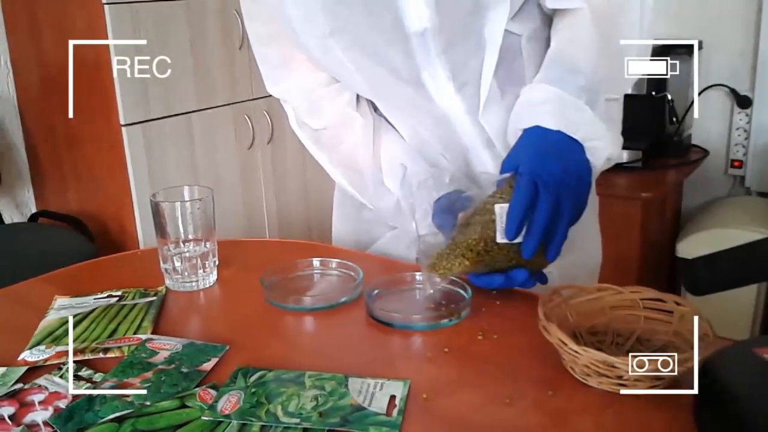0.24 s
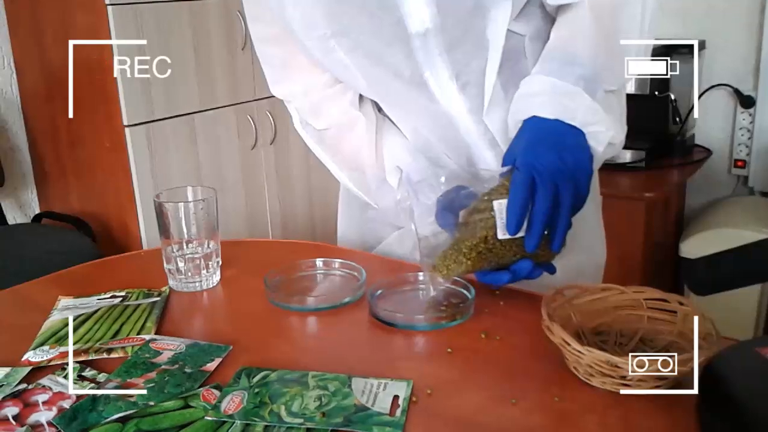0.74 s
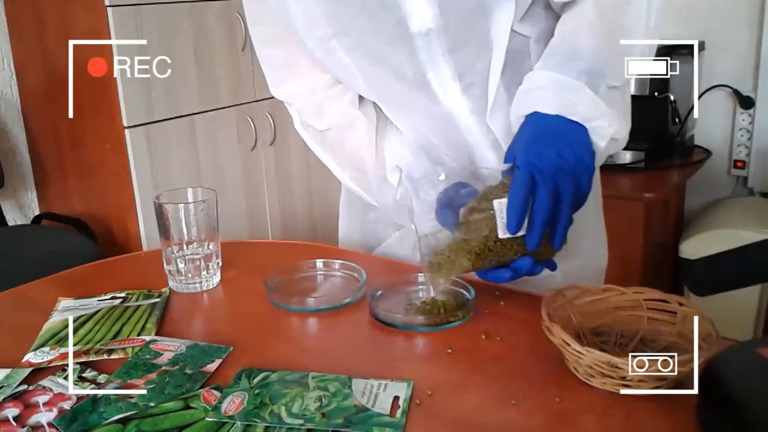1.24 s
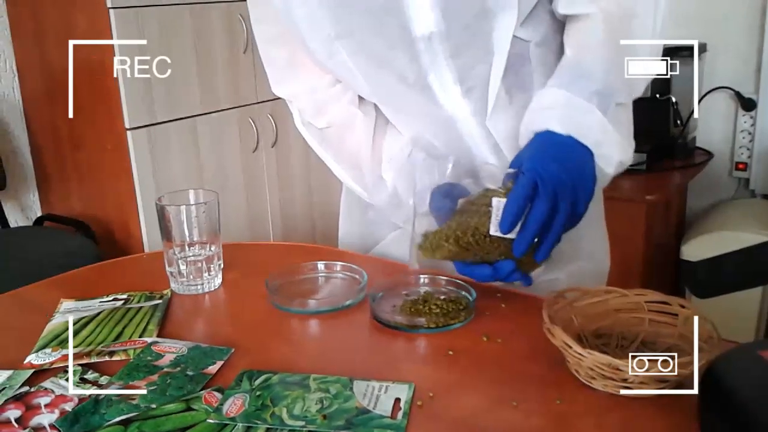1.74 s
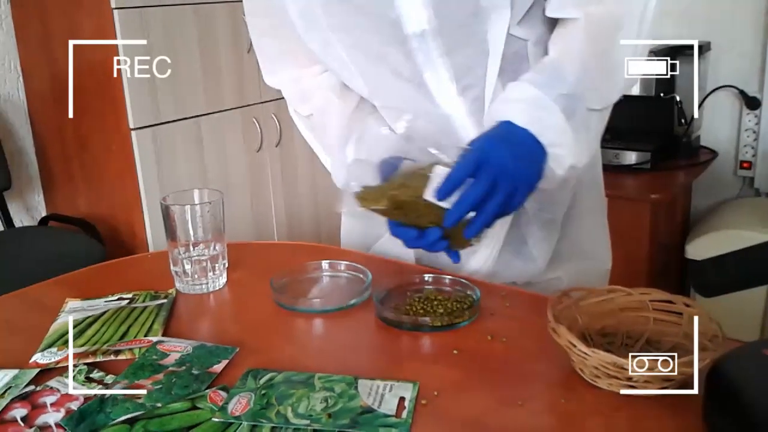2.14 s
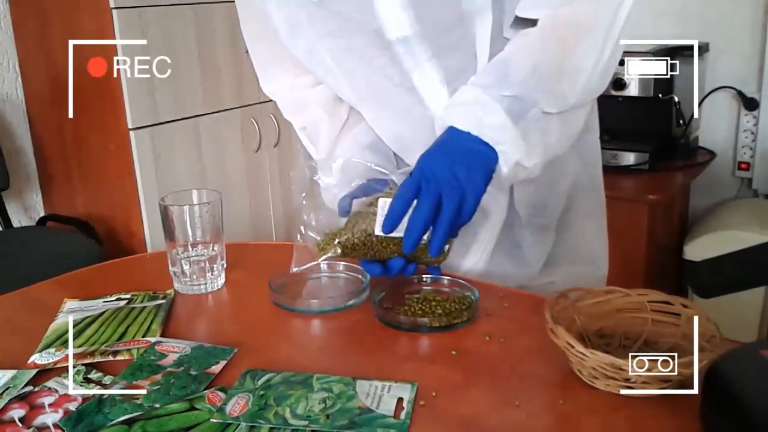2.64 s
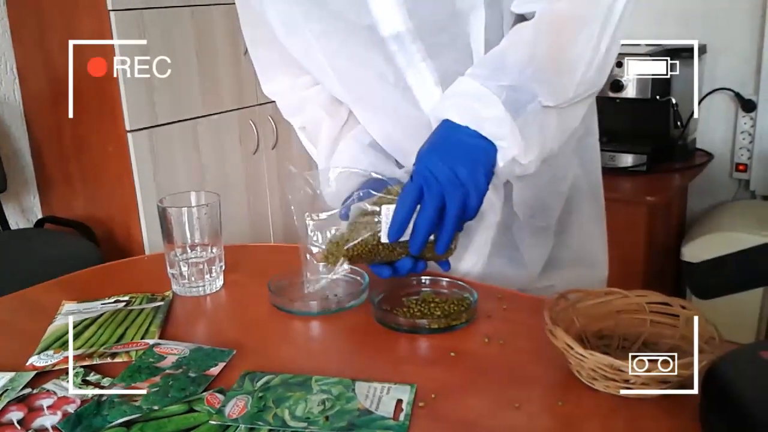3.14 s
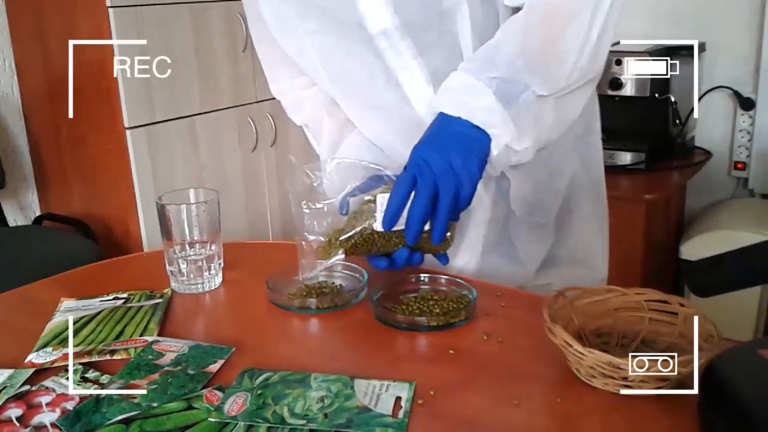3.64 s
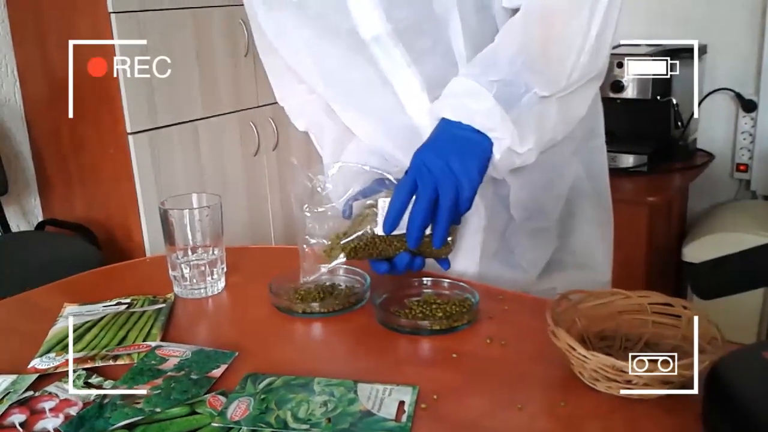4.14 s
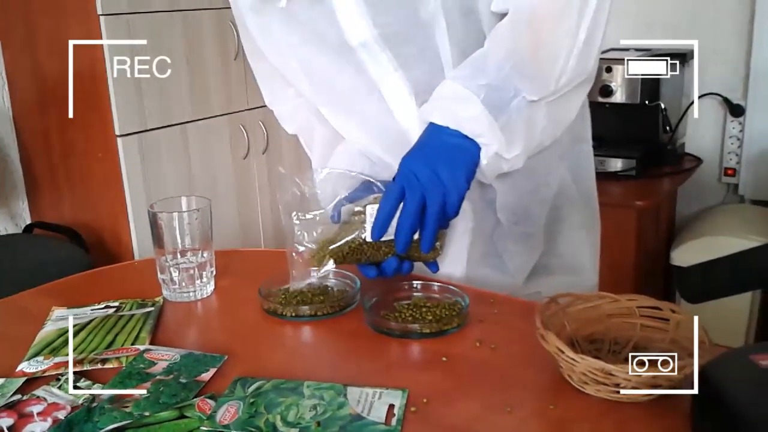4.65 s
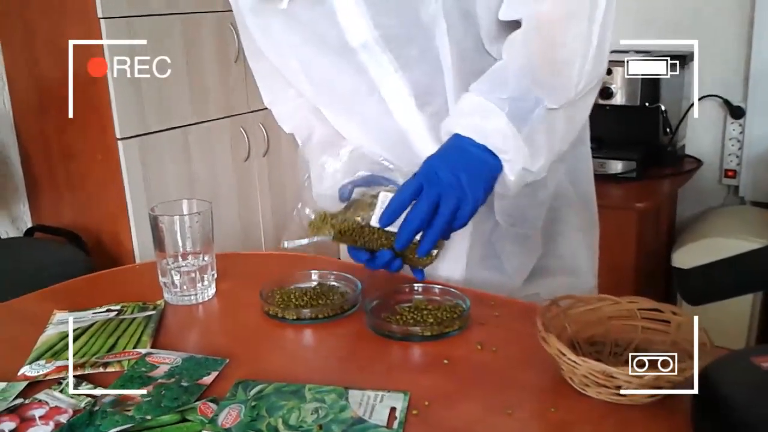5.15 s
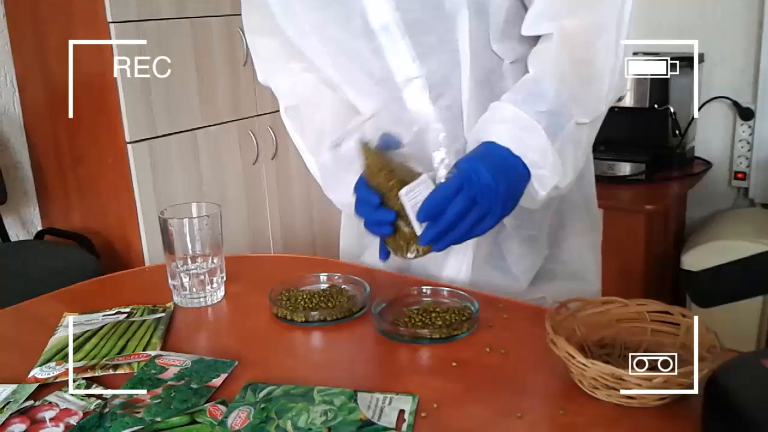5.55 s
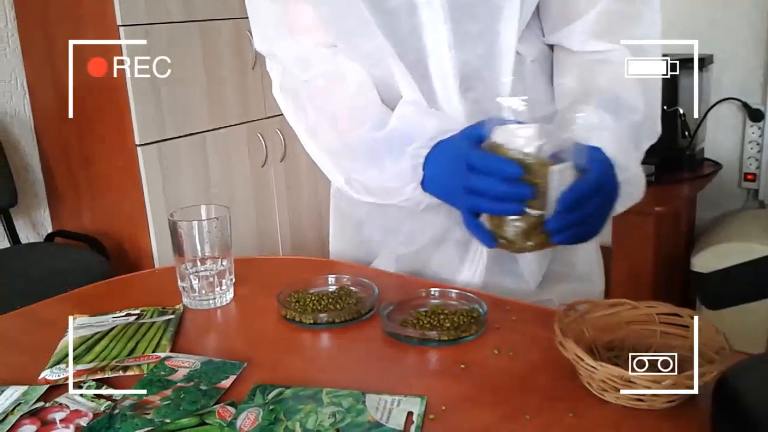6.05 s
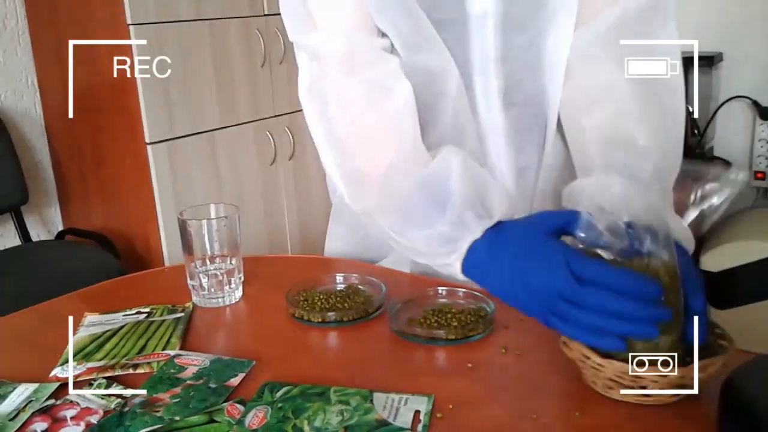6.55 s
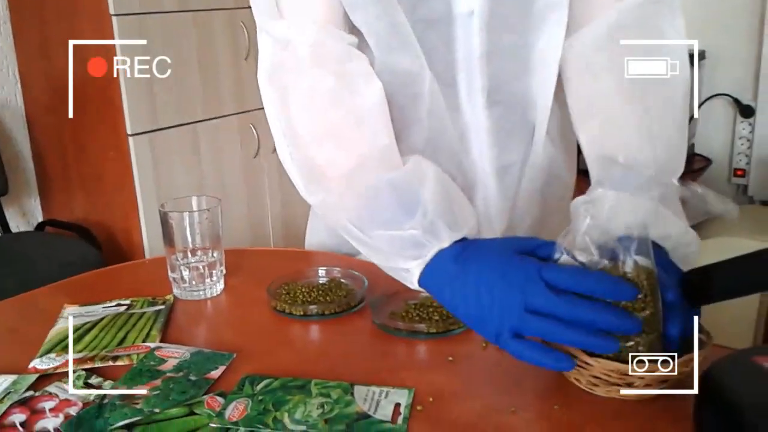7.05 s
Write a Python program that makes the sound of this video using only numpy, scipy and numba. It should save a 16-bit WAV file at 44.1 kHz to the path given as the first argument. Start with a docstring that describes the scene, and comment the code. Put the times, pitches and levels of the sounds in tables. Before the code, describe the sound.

Close in a small room, a plastic bag of dry beans crackles and its load slides with a swish. Beans rush into a thin glass dish with a bright, dense, glassy rattle that dulls as the heap grows. After a near-quiet gap, a lighter patter fills a second dish. Then the bag crunches loudly, beans tumbling inside, and is set down. The microphone sounds sharp and thin, with a piercing treble peak.

```python
"""Dry beans into two glass dishes

Small dry beans are poured from a crinkly plastic bag into two shallow glass dishes on a table, one by one.
Random impacts drive the gliding modes of the glass; as each heap grows, its weight lowers and damps them.
Bean clicks and bag rustle are coloured contact noise; creases snap as short bursts in four bands.
The bag is then turned upright and set down in a wicker basket.
A small room answers the sounds, and a microphone with a sharp treble peak colours it all."""
import sys
import numpy as np
from scipy import signal
from scipy.fft import rfft, irfft, next_fast_len
from scipy.io import wavfile
from scipy.ndimage import uniform_filter1d
from numba import njit

SR = 44100
rng = np.random.default_rng(int(sys.argv[2]) if len(sys.argv) > 2 else 0)


def digitize_waveform(pressure):
    """Quantize a signal to 16-bit integers and store it at the path in sys.argv[1].

    Rows of a 2-D input are taken as channels; values are limited to [-1, 1].
    """
    field = np.atleast_2d(pressure).T
    bounded = np.clip(field, -1, 1)
    quanta = np.round(bounded * 32767).astype(np.int16)
    wavfile.write(sys.argv[1], SR, quanta)


N = 322371


def amp(db):
    """Decibels to gain."""
    return 10 ** (np.asarray(db) / 20)


def unit(x):
    """Scaled to rms 1."""
    return x / np.sqrt(np.mean(x ** 2) + 1e-20)


def along(points, hz):
    """(f/Hz, value) points read on a log frequency axis."""
    f, v = np.transpose(points)
    return np.interp(np.log(hz + 1), np.log(f + 1), v)


def curves(rows, outside=None):
    """One value per sample for each column after the time."""
    s, *cols = np.transpose(rows)
    t = np.arange(N) / SR
    return [np.interp(t, s, c, outside, outside) for c in cols]


def swells(rows):
    """Gain over time from bell-shaped swells (t/s, half length/s, level/dB)."""
    t = np.arange(N) / SR
    return sum(amp(db) * np.exp(-np.minimum(((t - s) / length) ** 2, 50)) for s, length, db in rows)


def coloured(x, points):
    """x through the causal minimum-phase filter with these (f/Hz, level/dB) points."""
    size = 2 * next_fast_len(N // 2 + 8192)
    gain = amp(along(points, np.fft.rfftfreq(size, 1 / SR)))
    cepstrum = irfft(np.log(gain))
    # folding the cepstrum forward in time makes the filter causal
    cepstrum[1:size // 2] *= 2
    cepstrum[size // 2 + 1:] = 0
    return irfft(rfft(x, size) * np.exp(rfft(cepstrum)))[:N]


def shaped(x, points):
    """x in the colour of a body, with the filter's mean power gain set to 1."""
    power = np.mean(amp(along(points, np.linspace(0, SR / 2, num=4096))) ** 2)
    return coloured(x, points) / np.sqrt(power)


def patter(rate, spread_db):
    """Random contacts of uneven size, rate a second, levelled to a local mean power near 1."""
    sizes = amp(spread_db * rng.standard_normal(N))
    hits = (rng.random(N) < rate / SR) * sizes * rng.choice([-1, 1], N)
    power = uniform_filter1d(uniform_filter1d(hits ** 2, size=2600), size=2600)
    return hits / np.sqrt(np.abs(power) + 1e-9)


def rustle(colour, rate, spread_db, rub):
    """Tiny contacts, each ringing briefly at one of many pitches, on a bed of smooth rubbing noise; rms 1."""
    grains = np.zeros(N)
    for hz in np.geomspace(300, 14000, num=14):
        grains += signal.lfilter(*signal.iirpeak(hz, 3, fs=SR), patter(rate, spread_db))
    return unit(coloured(unit(grains) + rub * rng.standard_normal(N), colour))


USUAL_DB = -50  # usual handling level


def following(level_db, law):
    """Gain of a layer that rises and falls with a handling level."""
    layer_db, slope = law
    return amp(layer_db + slope * (level_db - USUAL_DB))


# the five moves of the bag: (t/s, beans sliding level/dB, film crinkling level/dB before its lift)
TIPPING = [(0.0, -46.5, -41.5), (0.3, -32.5, -53), (0.41, -41.5, -49), (0.54, -56, -70.5),
           (0.95, -61.5, -93)]
OVER_FIRST_DISH = [(1.099, -50, -71), (1.24, -38.5, -65), (1.33, -39.5, -53.5), (1.65, -42, -51),
                   (1.83, -48.5, -64.5), (2.16, -48.5, -61.5), (2.32, -57, -70), (2.48, -67, -74),
                   (2.6, -92, -121)]
OVER_SECOND_DISH = [(3.05, -89.5, -100), (3.48, -56.5, -79), (3.7, -52, -60), (3.95, -50.5, -55),
                    (4.55, -60, -67.5), (5.2, -50, -57), (5.56, -50, -67.5)]
TURNING_UPRIGHT = [(5.63, -49.5, -63.5), (5.71, -33.5, -43), (5.88, -41, -53.5), (6.0, -31, -51),
                   (6.13, -34, -47.5), (6.27, -54.5, -62)]
SETTING_DOWN = [(6.3, -54, -63), (6.42, -44.5, -62.5), (6.5, -52.5, -57), (6.64, -43, -49.5),
                (6.77, -32.5, -46), (6.83, -45, -55), (6.94, -35.5, -45.5), (7.06, -45, -49),
                (7.19, -43, -49.5), (7.31, -44, -52.5)]
HANDLING = TIPPING + OVER_FIRST_DISH + OVER_SECOND_DISH + TURNING_UPRIGHT + SETTING_DOWN
# layers that go along with it: (level/dB at the usual handling level, gain/dB per dB of handling)
SHIFT_LAW = (-58, 0.59)
GLIDE_LAW = (-56, 0.55)
# the whole load tumbles over in the bag: (t/s, half length/s, level/dB)
TUMBLES = [(5.71, 0.038, -35), (6.04, 0.14, -41), (6.77, 0.023, -46), (6.94, 0.046, -49)]
# runs of beans skidding down the film: (t/s, half length/s, level/dB)
SKIDS = [(0.48, 0.14, -59.5), (1.36, 0.028, -54), (2.39, 0.056, -56), (3.65, 0.28, -59), (5.46, 0.065, -58),
         (5.71, 0.04, -55), (6.5, 0.044, -52.5), (7.18, 0.06, -74)]
# colours of load shifting, beans sliding, film crinkling, beans hissing over film: (f/Hz, relative level/dB)
SHIFT_COLOUR = [(120, -32), (280, 2), (480, 3), (750, 2), (1200, -16.5), (2500, -29)]
SLIDE_COLOUR = [(400, -37), (900, -1), (1600, 2), (2400, -0.5), (3400, -6.5), (4300, -18), (6000, -39.5),
                (15000, -59)]
FILM_COLOUR = [(1500, -23), (2800, 2.5), (3800, 4), (5000, 2), (6700, -13.5), (8000, -8.5), (11000, -11.5),
               (15500, -14.5)]
GLIDE_COLOUR = [(3500, -53.5), (5800, -16), (6500, -1.5), (6950, -2.5), (7400, -11), (8200, -11.5),
                (9500, -21), (15000, -20.5)]


def bag():
    """The beans slide and shift inside the bag, and hiss over its film as that crinkles."""
    slide_db, film_db = curves(HANDLING)
    shift_gain = following(slide_db, SHIFT_LAW) + swells(TUMBLES)
    glide_gain = np.hypot(following(film_db, GLIDE_LAW), swells(SKIDS))
    film_gain = amp(film_db + 9.5)  # the film's lift
    shift = shift_gain * rustle(SHIFT_COLOUR, rate=150, spread_db=5.5, rub=0.33)
    slide = amp(slide_db) * rustle(SLIDE_COLOUR, rate=300, spread_db=5.5, rub=0.15)
    film = film_gain * rustle(FILM_COLOUR, rate=220, spread_db=1.5, rub=0.86)
    glide = glide_gain * rustle(GLIDE_COLOUR, rate=600, spread_db=8.5, rub=0.44)
    return shift + slide + film + glide


# low background rumble that rises and falls over time: (t/s, deep level/dB, upper bass level/dB)
RUMBLE = [(0.0, -46, -44.5), (0.5, -57, -48.5), (1.0, -52.5, -54.5), (1.3, -57, -51.5), (2.25, -59, -52.5),
          (2.6, -68.5, -65), (2.95, -69.5, -72.5), (3.5, -64.5, -63.5), (3.8, -60, -61), (4.25, -64, -53),
          (4.6, -61, -58), (5.55, -63, -55.5), (5.7, -62, -50.5), (5.85, -61, -56), (6.0, -63, -54),
          (6.55, -62, -57.5), (6.75, -49, -47), (7.0, -56, -52), (7.31, -57, -51)]
# dull bumps of the hands and bag: (t/s, half length/s, deep level/dB)
BUMPS = [(0.04, 0.1, -38), (0.29, 0.091, -35.5), (0.45, 0.082, -45.5), (0.61, 0.02, -43.5),
         (0.81, 0.1, -39.5), (4.57, 0.057, -52), (6.72, 0.065, -40.5), (6.86, 0.03, -46),
         (7.09, 0.038, -55)]
BUMP_BASS_DB = -9.5  # upper bass of a bump, against its deep part
# colours of the deep part, the upper bass and the steady hiss: (f/Hz, relative level/dB)
DEEP_COLOUR = [(20, -32), (40, -10), (62, -4), (105, -1), (150, -12), (300, -57)]
BASS_COLOUR = [(80, -33.5), (135, 5.5), (175, 4), (260, -3.5), (400, -19.5), (900, -43.5)]
HISS_COLOUR = [(30, 18), (150, 17), (400, 13.5), (900, -5.5), (2000, -6), (6000, -7.5), (12000, 1.5),
               (16000, -3)]


def background():
    """Low rumble of varying level, a few bumps and a faint steady hiss, all from filtered noise."""
    def noise(colour):
        return unit(coloured(rng.standard_normal(N), colour))

    deep_db, bass_db = curves(RUMBLE)
    bumps = swells(BUMPS)
    deep = np.hypot(amp(deep_db), bumps)
    bass = np.hypot(amp(bass_db), amp(BUMP_BASS_DB) * bumps)
    return deep * noise(DEEP_COLOUR) + bass * noise(BASS_COLOUR) + amp(-73.5) * noise(HISS_COLOUR)


THUD_HZ, BODY_HZ = 713, 1900  # usual pitches of a snap's thud and of a small crease
PITCH_SCATTER = 0.16  # spread of both, in natural-log units
CRACKLE_DB, CRACKLE_SPREAD_DB = 22.5, 3.5  # small creases against the handling level, and their spread


def crackles(count):
    """Small creases at random moments, as strong as the bag is being worked; rows like those of SNAPS."""
    handling_db = np.mean(curves(HANDLING), axis=0)
    at = rng.integers(N, size=count)
    pitch, size, thud, bright = rng.standard_normal((count, 4)).T
    body_hz = BODY_HZ * np.exp(PITCH_SCATTER * pitch)
    level_db = handling_db[at] + CRACKLE_DB + CRACKLE_SPREAD_DB * size
    return list(zip(at / SR, body_hz, level_db, -11 + 5 * thud, -2 + 6 * bright))


def burst(low_hz, high_hz, t60, after_db, after_t60):
    """A crack in one band, energy 1, and the weaker, longer flutter of the film that goes with it."""
    t = np.arange(SR // 8) / SR
    band = signal.butter(2, [low_hz, min(high_hz, .45 * SR)], "band", fs=SR, output="sos")
    rise = 1 - np.exp(-t / 0.00041)  # the crease takes a moment to give way
    fades = rise * np.array([amp(-60 * t / t60), amp(-60 * t / after_t60)])
    parts = signal.sosfilt(band, fades * rng.standard_normal(fades.shape))
    crack, flutter = parts / np.linalg.norm(parts, axis=1, keepdims=True)
    return crack + amp(after_db) * flutter


# creases of the bag snapping over: (t/s, body f/Hz, level/dB, thud of the beans behind it: relative
# level/dB before its trim, brightness: relative level/dB before the crack's trim)
SNAPS = [(0.0105, 2180, -6, -14, 2), (0.0367, 2220, -6, -28.5, 5.5), (0.109, 2080, -7.5, -22, 11),
         (0.1236, 3000, -23, -16.5, 22), (0.2438, 3230, 0, -26, -0.5), (0.3418, 1910, -0.5, -18, -1),
         (0.37, 1600, -1, -9.5, -0.5), (0.3817, 1700, -4.5, -22, -14), (0.4334, 2560, -3, -24.5, -1.5),
         (0.4965, 2930, -10.5, -30.5, 0.5), (0.53, 3300, -14.5, -30, -11), (0.6099, 1690, -2.5, -17, -32),
         (0.63, 3240, -14, -22, -14), (0.8186, 1200, -18, -5, -12), (1.1638, 1440, -4, -9.5, -7),
         (1.2847, 1600, -1, -5, -8.5), (1.2888, 462, -2.5, -23, -23.5), (1.5329, 1550, -9.5, -5, 2.5),
         (1.9731, 1500, -4.5, -18, -27), (2.0932, 1520, -7, -11, -17), (2.1058, 1600, -0.5, -18.5, -10),
         (2.1791, 1600, -20, 5, -15), (2.2431, 1660, -11, -20, 4), (2.2997, 1760, -14, -22, -21),
         (2.4701, 3080, -19, -34, -2), (2.941, 1460, -45.5, 0.5, -17), (3.5817, 1600, -19.5, -15, -2),
         (3.6637, 1600, -11.5, -16, -15), (3.8323, 1960, -8, -14, -3), (3.9454, 2760, -7.5, -11, -5.5),
         (4.2363, 630, -11.5, -27, 4), (4.2446, 1740, -9.5, -3.5, -3), (5.2383, 1730, -10.5, -30, -1),
         (5.306, 735, 1.5, -20, -9.5), (5.3422, 1400, -13, -8, 8), (5.4295, 3140, -6, -9.5, -15),
         (5.4341, 2470, -18, -13, 12), (5.4902, 870, -8.5, -12, -11), (5.5987, 1630, -16.5, -3, -11),
         (5.6308, 1640, -6.5, -9, -9), (5.6684, 2630, -2, -3.5, -2), (5.6732, 1360, -5, -17.5, -1.5),
         (5.7171, 1550, -3, -22, 2), (5.7427, 1480, -8, 0.5, -12), (5.748, 3300, 0, -18, -0.5),
         (5.7754, 1540, 5, -7.5, -10), (5.831, 1810, -4.5, -12, -5), (5.861, 2020, -9, -3, 2),
         (5.9449, 2170, -4, -6, -24), (5.9945, 1470, -8.5, -14, -22), (6.0197, 3140, -4, -28, 0.5),
         (6.0765, 1870, -2.5, -20, -25), (6.1333, 1630, -5, 0, -11), (6.1755, 1920, -2, -16, -3.5),
         (6.224, 1460, -14, -1, -4), (6.308, 1990, -5, -5, -4), (6.3347, 2250, -11.5, -7, -4.5),
         (6.417, 1560, -1, -7, -29), (6.451, 1900, -3, -11.5, -8), (6.49, 1920, -4, -13, -17.5),
         (6.5258, 1740, -4.5, -11.5, -18), (6.5502, 2050, 2.5, -12.5, -3), (6.5625, 1980, -8, -18, -1.5),
         (6.5937, 1790, -8.5, -28, 0.5), (6.6309, 1700, -1, -10.5, -10), (6.677, 1970, 0, -10, -8.5),
         (6.6846, 2600, -1, -24, -16), (6.6912, 2180, 3, -2.5, -5), (6.7212, 2310, 6.5, -19, -1),
         (6.7462, 2210, 5, -6, -3), (6.7614, 2270, 2.5, -27.5, 1.5), (6.7809, 1780, -8.5, -14, 10),
         (6.799, 1450, 1.5, -5.5, -9.5), (6.8393, 3000, -22, -16, 17.5), (6.8506, 1340, 3.5, -14.5, -3.5),
         (6.86, 1920, 5.5, -14, -1.5), (6.9197, 1990, 2, -37, -15.5), (6.9541, 1590, -4, -5.5, -4),
         (6.9632, 2200, 1, -5, -5.5), (6.98, 2480, -4, -28, -10.5), (7.0029, 2900, 4.5, -32, -4),
         (7.047, 1740, -8, -17, 4), (7.0682, 1580, -5, -2.5, 1), (7.1079, 1800, 1.5, -17, -15),
         (7.1628, 2760, -2.5, -19, -2), (7.2167, 3100, -7, -31, -6), (7.25, 1630, -2.5, -6.5, -14)]
EDGE_DB, EDGE_PER_BRIGHTNESS = -6, 0.41  # the hard edge of a snap grows with its brightness


def snaps():
    """Each crease snaps with a thud, a body, a hard edge and a treble crack, each with its flutter."""
    out = np.zeros(N + SR)
    for s, body_hz, db, weight_db, bright_db in SNAPS + crackles(count=50):
        thud_hz = THUD_HZ * np.exp(PITCH_SCATTER * rng.standard_normal())
        edge_db = EDGE_DB + EDGE_PER_BRIGHTNESS * bright_db
        thud = burst(0.58 * thud_hz, 1.3 * thud_hz, t60=0.0078, after_db=-4.5, after_t60=0.16)
        body = burst(0.73 * body_hz, 1.438 * body_hz, t60=0.0095, after_db=-3.5, after_t60=0.096)
        edge = burst(3000, 4600, t60=0.0083, after_db=-4.0, after_t60=0.13)
        crack = burst(4300, 12050, t60=0.0083, after_db=-3, after_t60=0.19)
        snap = amp(weight_db + 2.0) * thud + amp(-1.0) * body + amp(edge_db) * edge + amp(bright_db - 7) * crack
        out[round(s * SR):][:len(snap)] += amp(db) * snap
    return out[:N]


# colour of a bean's click: (f/Hz, relative level/dB)
BEAN_COLOUR = [(300, -21.5), (1200, -22.5), (1600, -4.5), (2300, -28.5), (2900, -3), (3280, 12),
               (3650, 4.5), (4200, -21.5), (5500, -20), (7000, -19), (9000, -44.5), (15000, -46.5)]
BEAN_SIZE_SPREAD = 0.049  # large beans click lower by this share, small beans higher


def clicking(contacts):
    """Each contact sounds with the click of a large, a usual or a small bean."""
    size = rng.integers(-1, 2, N)
    out = np.zeros(N)
    for k in (-1, 0, 1):
        colour = np.array(BEAN_COLOUR) * [1 - k * BEAN_SIZE_SPREAD, 1]
        out += shaped(contacts * (size == k), colour)
    return out


@njit
def ringing(drive, turn, loss):
    """One mode whose pitch and damping (radians, nepers a sample) change; it keeps its drive's power."""
    out, state = np.zeros(len(drive)), 0j
    for i in range(len(drive)):
        state = state * np.exp(1j * turn[i] - loss[i]) + drive[i] * 2 * np.sqrt(loss[i])
        out[i] = state.imag
    return out


BLOW_SPREAD_DB = 2.5  # uneven strength of the blows on the glass


def pour(stream, filling, modes, taps, damping, glass_rate, click_rate, click_spread_db,
         ring_db, cover_db, click_db, heap_db, tick_db):
    """Beans bounce on glass and heap; the heap's weight lowers the glass modes and shortens their ring."""
    flow = amp(curves(stream, outside=-120)[0])
    fill = np.clip(curves(filling)[0], 0, 1)
    covered = np.sqrt(fill)  # the first beans cover the most glass
    hard = np.zeros(N)
    for s, db in taps:
        hard[round(s * SR)] = amp(db)
    blows = (flow * patter(glass_rate, BLOW_SPREAD_DB) + hard) * amp(ring_db + cover_db * covered)
    clicks = (flow * patter(click_rate, click_spread_db) + hard) * amp(click_db + heap_db * covered)
    glass = amp(tick_db) * blows  # the bare tick of each blow
    for empty_hz, full_hz, empty_db, full_db, t60 in modes:
        # where a bean lands decides how strongly it drives each mode
        spot = rng.choice([-1, 1], N) * amp(1.76 * rng.standard_normal(N))
        turn = 2 * np.pi * (empty_hz + (full_hz - empty_hz) * fill) / SR
        loss = np.log(1000) / (t60 * SR) * (1 + abs(damping) * fill)
        level = amp(empty_db + (full_db - empty_db) * fill)
        glass = glass + level * ringing(blows * spot, turn, loss)
    return glass + clicking(clicks)


# the stream of beans into the first dish: (t/s, flow level/dB)
FIRST_STREAM = [(0.58, -44), (0.638, -29), (0.976, -68), (1.0, -40.5), (1.142, -41), (1.244, -23.5),
                (1.252, -33), (1.37, -22.5), (1.384, -21), (1.698, -30), (2.13, -31.5), (2.208, -48),
                (2.242, -43.5), (2.32, -62)]
# how full the first dish is: (t/s, share 0-1)
FIRST_FILL = [(1.15, 0.07), (1.4, 0.34), (1.8, 1)]
# modes of the first dish: (empty f/Hz, full f/Hz, empty level/dB, full level/dB, empty t60/s)
FIRST_GLASS = [(6600, 6400, -14, -14, .13), (6750, 6580, -24, -22, .04), (9720, 9300, -16, -20, .07),
               (10500, 10150, -21, -29, .04), (11950, 11600, -32, -14, .08), (13500, 13150, -24, -24, .07),
               (14450, 14180, -26, -24, .06)]
# single beans that land hard, in both dishes: (t/s, level/dB before the blow and click gains)
TAPS = [(0.646, -13), (0.679, -3), (0.772, -10), (0.991, -12.5), (1.043, -11), (1.377, -2), (1.441, -18),
        (1.508, 2.5), (1.571, 0), (1.805, -0.5), (2.036, -5), (2.121, -3), (2.969, -46.5), (3.197, -41),
        (3.289, -43), (3.348, -27.5), (3.431, -26), (3.503, -14.5), (3.585, -8.5), (3.71, -15),
        (3.815, -12), (3.941, -6.5), (3.984, -6), (4.061, -4), (4.104, -8.5), (4.202, -3.5), (4.263, -9.5),
        (4.367, -15), (4.433, -11.5), (4.413, -8.5), (4.494, -13), (4.534, -13.5), (4.697, -11.5),
        (4.76, -11), (4.803, -8), (4.884, -14), (4.94, -7), (5.116, -11), (5.163, -20), (5.21, -15),
        (5.271, -10), (5.331, -10.5), (5.385, -13), (5.451, -6.5)]


def first_dish():
    """The first dish rings under the beans while their clicks on each other grow with the heap."""
    taps = [tap for tap in TAPS if tap[0] < FIRST_STREAM[-1][0]]
    return pour(FIRST_STREAM, FIRST_FILL, FIRST_GLASS, taps, damping=2.2, glass_rate=550, click_rate=250,
                click_spread_db=1.0, ring_db=-6.5, cover_db=0.0, click_db=-26, heap_db=16.5, tick_db=-20.5)


# the stream of beans into the second dish: (t/s, flow level/dB)
SECOND_STREAM = [(3.2, -84.5), (3.36, -66.5), (3.45, -49.5), (3.55, -42.5), (3.72, -39), (3.92, -35.5),
                 (4.1, -39.5), (4.23, -38), (4.55, -48.5), (4.77, -41), (5.04, -34.5), (5.3, -37),
                 (5.38, -56), (5.52, -52)]
# how full the second dish is: (t/s, share 0-1)
SECOND_FILL = [(3.0, 0.014), (3.55, .15), (4.25, 0.695), (5.5, 1)]
# modes of the second dish: (empty f/Hz, full f/Hz, empty level/dB, full level/dB, empty t60/s)
SECOND_GLASS = [(6220, 5820, 2, -1, .05), (9000, 8500, 5, 2, .15), (10150, 9800, -20, -24, .05),
                (11230, 10650, -14, 2, .06), (12900, 12420, -1, -3, .1), (14050, 13650, -13, -16, .07)]


def second_dish():
    """The second dish is driven hardest while bare; the heap then shields the glass from the blows."""
    taps = [tap for tap in TAPS if tap[0] >= FIRST_STREAM[-1][0]]
    return pour(SECOND_STREAM, SECOND_FILL, SECOND_GLASS, taps, damping=1.7, glass_rate=390, click_rate=340,
                click_spread_db=4, ring_db=1.46, cover_db=-17, click_db=-1.0, heap_db=2.5, tick_db=-18.5)


# soft scuffs as the bag is handled: (t/s, half length/s, centre f/Hz, level/dB)
SCUFFS = [(4.185, 0.073, 297, -45.5), (7.081, 0.027, 443, -43)]


def scuffs():
    """Brief dull rubs, noise around one low pitch, that swell and fade."""
    out, t = np.zeros(N), np.arange(N) / SR
    for s, length, hz, db in SCUFFS:
        colour = [(hz / 2, -40), (hz, 0), (hz * 2, -40), (hz * 8, -80)]
        rub = unit(coloured(rng.standard_normal(N), colour))
        out += amp(db) * np.exp(-((t - s) / length) ** 2) * rub
    return out


# reverberation of the small room: (f/Hz, t60/s)
ROOM = [(150, 0.16), (1500, 0.24), (6000, 0.1), (14000, 0.31)]


def room(x):
    """The walls answer 4 ms later with a noise tail; each frequency fades at its own rate."""
    hz, t, z = signal.stft(rng.standard_normal(SR // 2), SR, nperseg=256)
    fade = amp(-60 * t / along(ROOM, hz)[:, None])
    tail = signal.istft(z * fade, SR, nperseg=256)[1]
    answer = np.pad(tail / np.linalg.norm(tail), (SR // 250, 0))
    return signal.fftconvolve(x, answer)[:N]


def scene():
    """The bag and two pours in the room, over the background."""
    direct = bag() + snaps() + first_dish() + second_dish() + scuffs()
    return (direct + amp(-10.5) * room(direct) + background())[None]


# response of the microphone: (f/Hz, gain/dB)
MIC = [(1200, -1.5), (1680, 2.5), (2300, -4), (3400, -2), (4300, -12), (5700, 2), (6250, 13), (6650, 18.5),
       (7100, 16.5), (7700, 1.5), (9000, -6), (11800, -11.5), (12350, -39), (13300, -28), (14600, -20.5),
       (15600, -35)]
TOP_HZ = 15800  # the recorder's band limit


def record(dry):
    """The microphone's treble peak, a soft ceiling on the loudest peaks, then the recorder's band limit."""
    sound = coloured(dry[0], MIC)
    sound = sound / (1 + (sound / .7) ** 4) ** .25
    passed = np.fft.rfftfreq(N, 1 / SR) < TOP_HZ
    return irfft(rfft(sound) * passed, N)[None]


dry = scene()
out = record(dry)
digitize_waveform(out)
```